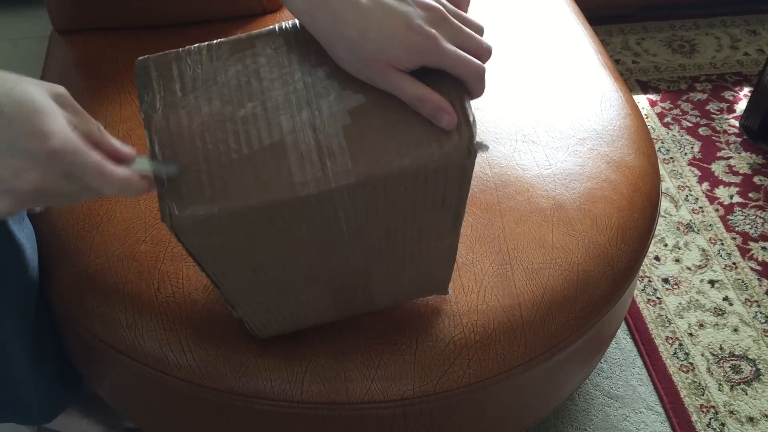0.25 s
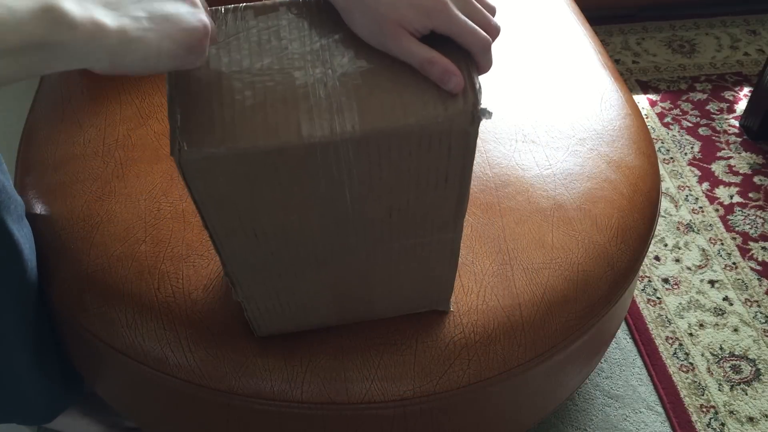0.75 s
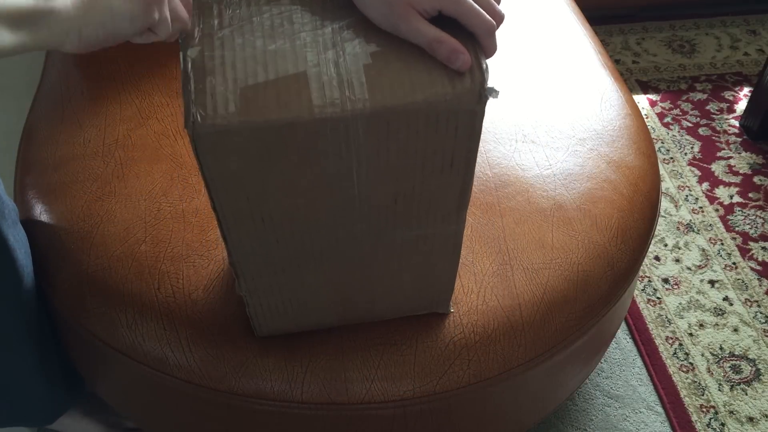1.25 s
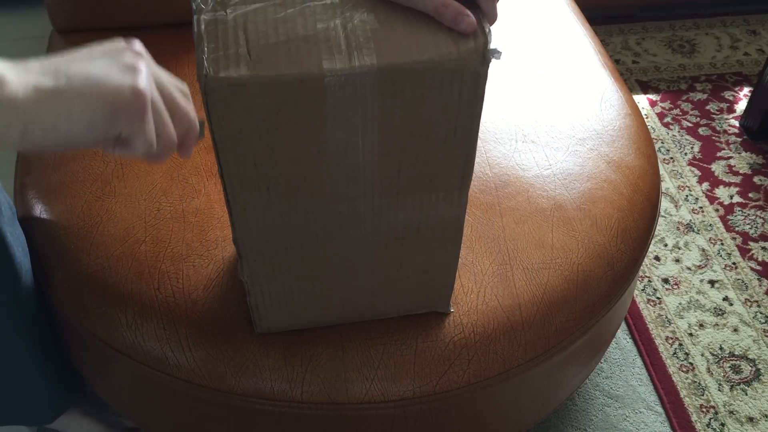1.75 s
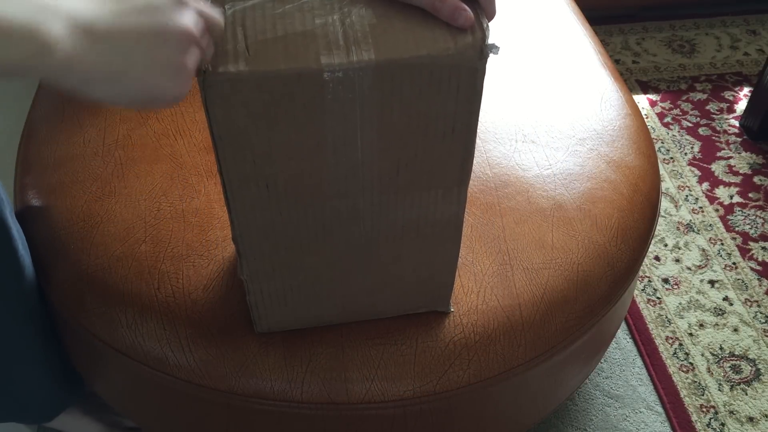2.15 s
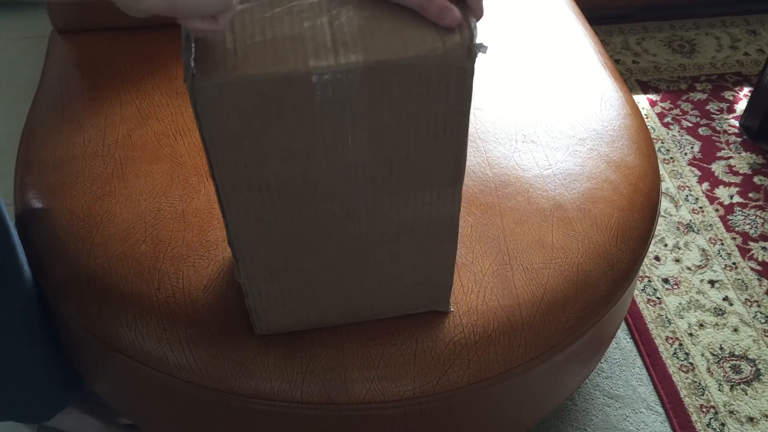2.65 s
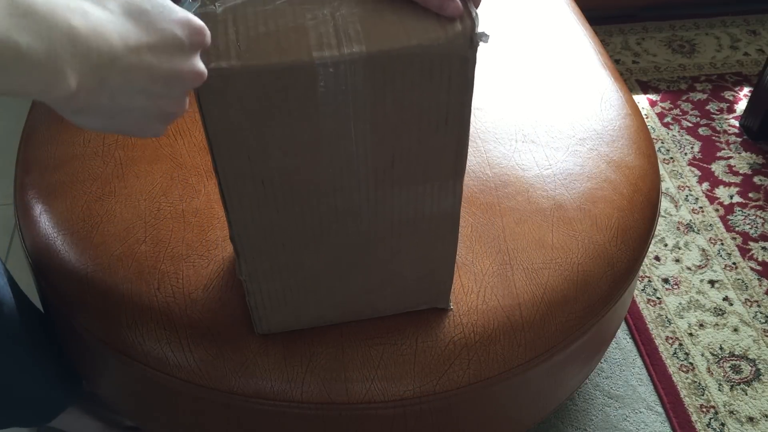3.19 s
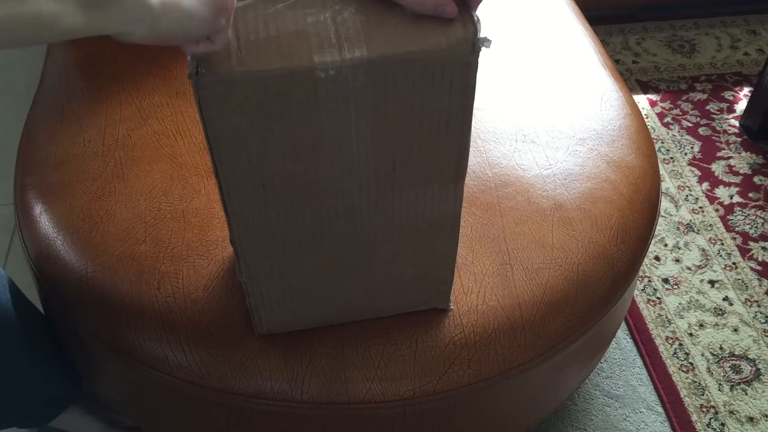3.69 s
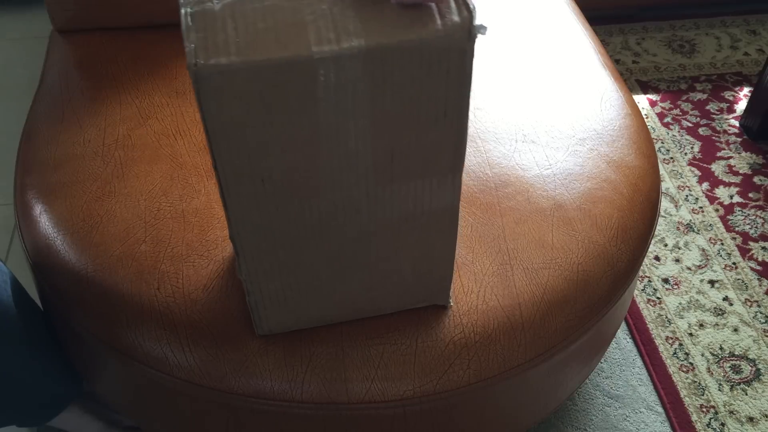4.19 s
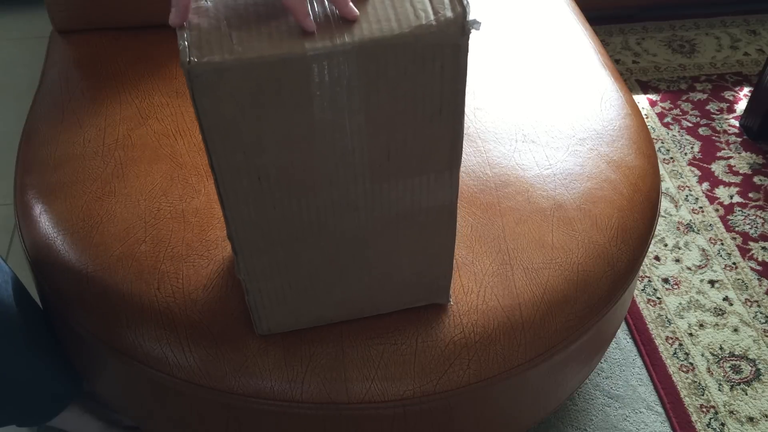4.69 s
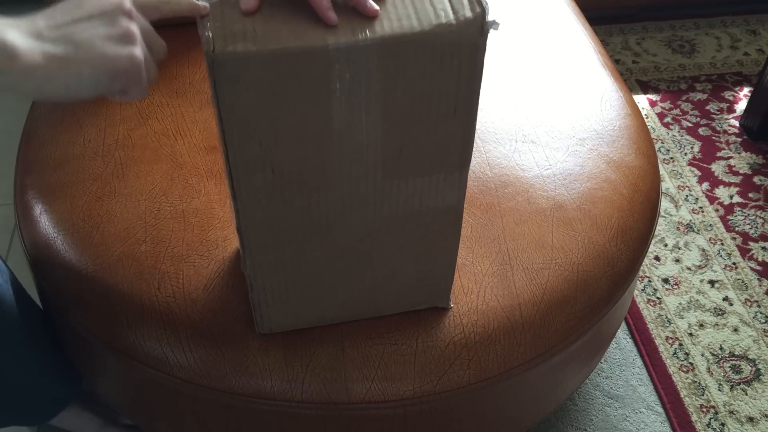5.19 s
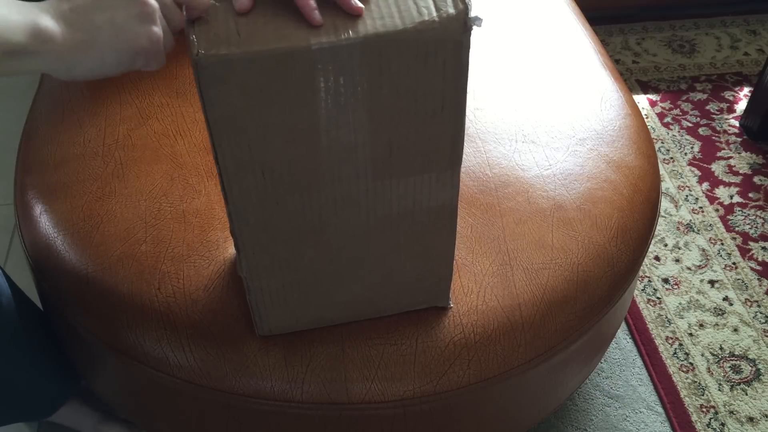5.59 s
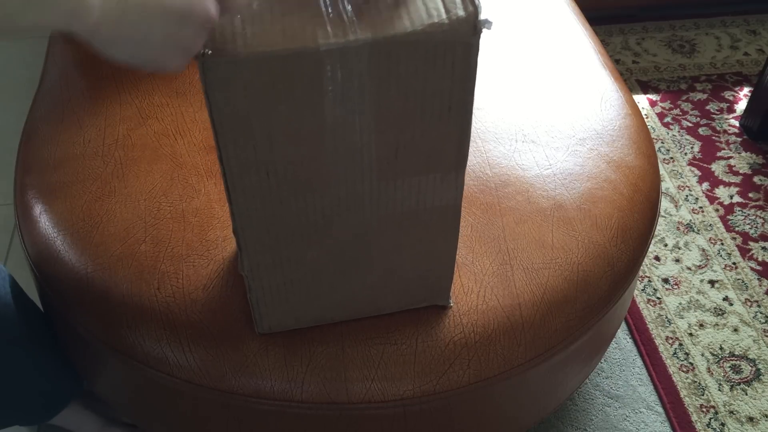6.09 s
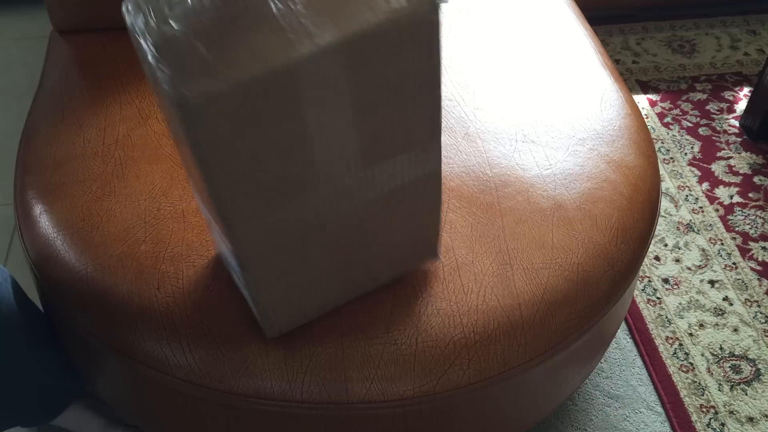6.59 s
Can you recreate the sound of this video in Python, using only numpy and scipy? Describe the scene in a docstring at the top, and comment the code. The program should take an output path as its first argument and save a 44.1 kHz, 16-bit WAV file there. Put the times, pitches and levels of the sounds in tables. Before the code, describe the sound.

Close to the microphone in a quiet, slightly live room, hands rub and pick at tape on a hollow cardboard box. Small crackly snaps lead to one huge, distorted pop, then a lull with soft bumps. Short gritty tears and knocks follow in separate bursts, a panel springs back with a hollow pop, and firm scrapes end it over faint mains hum.

```python
"""Packing tape on a cardboard box is handled and cut close to the microphone, in a quiet room with a mains hum
(6.9 s). Hands slide over the tape; at 1.5 s a blade punctures it with the loudest snap, which overloads the
microphone. The blade slices through the tape near 2.9 and 4.0 s, with short tearing strokes near 4.5 and 5.3 s,
amid knocks, light ticks and strokes; at 5.5 s a panel springs back. Rips, scrapes and snaps are random trains
of tiny breaks, filtered by the resonances of box and film; bumps and ticks are short bursts of the same kind,
the panel is a decaying sine, and the walls add diffuse tails."""
import sys
import numpy as np
from scipy import signal
from scipy.fft import rfft, irfft, next_fast_len
from scipy.io import wavfile
from scipy.ndimage import uniform_filter1d, map_coordinates

SR = 44100
rng = np.random.default_rng(int(sys.argv[2]) if len(sys.argv) > 2 else 0)


def log_audio(samples):
    """Write samples as a 16-bit WAV file to the path given in sys.argv[1]."""
    # one column per channel
    frames = np.atleast_2d(samples).T
    # limit to full scale, then quantise
    limited = np.clip(frames, -1, 1)
    pcm = np.round(limited * 32767).astype(np.int16)
    wavfile.write(sys.argv[1], SR, pcm)


N = 302085

# resonances of the hollow box: centre_hz, width_hz, relative_level_db
BOX_MODES = [(240.1, 52, 7.5), (372.6, 150, -8.5), (451.9, 55, -3), (599, 220, -7), (718, 85, -3.5),
             (944, 100, -2), (1240, 330, -4), (2040, 980, -7.5)]
# resonances of the taut film: centre_hz, width_hz, relative_level_db
FILM_MODES = [(2000, 390, -1.5), (2955, 500, 4.5), (3820, 1700, -1.5), (6400, 380, 0.5)]
# spectrum that breaking glue gives the film: frequency_hz, relative_density_db
FILM_BREAK_COLOUR = [(700, -24.5), (1900, 4), (3100, -2), (5000, -1.5), (6500, -2.5), (14000, -2)]
# spectrum of fine treble hiss and ticks: frequency_hz, relative_density_db
HISS_COLOUR = [(1500, -20.5), (3500, -8), (6400, 1), (7600, 1), (14000, 1.5)]


def amp(db):
    """Amplitude ratio of a level: 20 dB is a factor of ten."""
    return 10 ** (np.asarray(db) / 20)


def unit(x):
    """Normalisation to an rms of 1, so that a gain alone sets the level."""
    return x / np.sqrt(np.mean(x ** 2) + 1e-20)


def along(points, hz):
    """Linear interpolation over log frequency of (frequency_hz, value) points."""
    f, v = np.transpose(points)
    return np.interp(np.log(hz + 1), np.log(f + 1), v)


def coloured(x, points, modes=()):
    """Minimum-phase filtering: the cepstrum is folded to be causal; damped resonances may follow in parallel."""
    size = 2 * next_fast_len(len(x) // 2 + 2048)
    hz = np.fft.rfftfreq(size, 1 / SR)
    cepstrum = irfft(np.log(amp(along(points, hz))))
    cepstrum[1:size // 2] *= 2
    cepstrum[size // 2 + 1:] = 0
    response = np.exp(rfft(cepstrum))
    if len(modes):
        resonances = 0
        for k, (centre, width, db) in enumerate(modes):
            bandpass = 1j * hz * width / (centre * centre - hz * hz + 1j * hz * width)
            # neighbouring modes have opposite sign
            resonances = resonances + (-1) ** k * amp(db) * bandpass
        response = response * resonances
    return irfft(rfft(x, size) * response, size)[:len(x)]


def fractures(count, rate, spread_db, bed):
    """Fracture as shot noise: tiny breaks of glue and fibre, rate a second, of unequal size, on a finer bed."""
    sizes = amp(spread_db * np.clip(rng.standard_normal(count), -2, 2)) * rng.choice([-1, 1], count)
    breaks = unit(sizes * (rng.random(count) < rate / SR))
    return breaks + bed * rng.standard_normal(count)


def wobble(rate):
    """Band-limited random modulation: a smooth curve through rate random knots a second."""
    knots = rng.standard_normal(int(N * rate / SR) + 4)
    return map_coordinates(knots, [np.arange(N) * rate / SR])


def steadied(x, window=0.16):
    """Short-time normalisation: rms 1 over every window (s), the fine crackle kept."""
    power = np.abs(uniform_filter1d(x ** 2, max(2, round(window * SR))))
    return x / np.sqrt(power + 1e-12)


def roaming(x, modes, depth_db, rate):
    """Modal excitation by a moving contact, which feeds each resonance in changing measure."""
    total = 0
    for hz, width, db in modes:
        drive = x * amp(depth_db * wobble(rate))
        b, a = signal.iirpeak(hz, hz / width, SR)
        total = total + amp(db) * signal.lfilter(b, a, drive)
    return total


def played(rows, shape):
    """Incoherent superposition: two gains per sample, every row's shape at its two levels, added in power."""
    power = 0
    for *timing, low_db, high_db in rows:
        power = power + (amp([[low_db], [high_db]]) * shape(*timing)) ** 2
    return np.sqrt(power)


def background(air_db=-57.5):
    """Stationary noise and tones: coloured room air at a fixed rms, and the partials of a mains hum."""
    # spectrum of the room air: frequency_hz, relative_density_db
    air_colour = [(20, -12.5), (50, -8), (115, -10), (190, -16), (450, -33), (1200, -35.5), (4000, -42.5),
                  (15000, -48)]
    # partials of the mains hum: frequency_hz, rms_level_db
    hum_partials = [(59.6, -59.5), (120, -65), (360.5, -74)]
    t = np.arange(N) / SR
    hum = 0
    for hz, db in hum_partials:
        hum = hum + amp(db) * np.sqrt(2) * np.sin(2 * np.pi * (hz * t + rng.random()))
    return hum + amp(air_db) * unit(coloured(rng.standard_normal(N), air_colour))


def room(x, delay=.005):
    """Diffuse reverberation: noise decaying by band, with a freshly drawn noise tail for every third of a second."""
    # reverberation time of the room: frequency_hz, t60_s
    decay_points = [(150, 0.38), (900, 0.37), (1900, 0.54), (5000, 0.43), (15000, 0.34)]
    # strength of the reverberation: frequency_hz, relative_level_db
    level_points = [(250, -8.5), (600, -10), (1000, -8), (1900, -7), (4000, -6), (15000, -14)]
    out, step = np.zeros(N + 2 * SR), SR // 3
    for start in range(0, N, step):
        hz, t, z = signal.stft(rng.standard_normal(2 * SR // 3), SR, nperseg=256)
        t60 = along(decay_points, hz)[:, None]
        # equal energy whatever the decay time, before the level curve
        energy = np.sqrt(2 * np.log(1000) / (t60 * SR))
        fade = amp(along(level_points, hz)[:, None] - 60 * t / t60)
        tail = signal.istft(z * energy * fade, SR, nperseg=256)[1]
        wet = signal.fftconvolve(x[start:start + step], tail)
        out[start + round(abs(delay) * SR):][:len(wet)] += wet
    return out[:N]


def stroke(fastest, rise, fall, roundness=1.1, drop_db=25.5):
    """Level follows speed: a stroke quickens and slows in an arch, drop_db weaker at both ends than at its fastest."""
    t = np.arange(N) / SR - fastest
    return amp(-drop_db * np.abs(t / np.where(t < 0, rise, fall)) ** roundness)


def sliding(scrape_db=0.0, hiss_db=0, grip_db=2.5, firm_db=-47):
    """Friction noise: rubbing gives a fine hiss, a gritty scrape through the box, and crunches under a firm grip."""
    # strokes of hands and box: fastest_s, rise_s, fall_s, scrape_base_db, hiss_base_db
    strokes = [(0.2, 0.26, 0.87, -63.5, -73), (3.335, 0.056, 0.055, -58, -54.5),
               (3.79, 0.03, 0.066, -52.5, -50), (4.435, 0.14, 0.18, -57.5, -46.5),
               (4.52, 0.17, 0.024, -51.5, -54.5), (4.67, 0.031, 0.025, -76.5, -52),
               (5.1, 0.14, 0.27, -66, -62.5), (5.21, 0.056, 0.22, -53.5, -65),
               (5.93, 0.074, 0.07, -50.5, -47.5), (6.18, 0.069, 0.049, -45, -48),
               (6.45, 0.051, 0.097, -48, -53.5), (6.70, 0.18, 0.18, -56.5, -57)]
    # spectrum of the scraping contact: frequency_hz, relative_density_db
    scrape_colour = [(200, 0.5), (600, 3.5), (900, 2), (1300, 7.5), (2000, 2), (3500, 0.5), (8000, -7.5)]
    scrape, hiss = played(strokes, stroke)
    grip = unit(amp(grip_db * wobble(59)))
    grit = coloured(fractures(N, rate=440, spread_db=2.5, bed=0.6), scrape_colour)
    low = steadied(roaming(grit, BOX_MODES, depth_db=6.5, rate=33))
    high = unit(coloured(fractures(N, rate=560, spread_db=8.0, bed=2.6), HISS_COLOUR))
    crushing = coloured(fractures(N, rate=260, spread_db=5.0, bed=0), scrape_colour)
    crunch = steadied(roaming(crushing, [*BOX_MODES, *FILM_MODES], depth_db=6, rate=51))
    # a light touch only rustles; a firm one also crushes board and film
    firmness = scrape / (scrape + amp(firm_db))
    rubbing = amp(scrape_db) * scrape * (low + firmness * crunch)
    return grip * (rubbing + amp(hiss_db) * hiss * high)


def pull(start, hardest, end):
    """Tension and release: the tape grabs, the tension builds and slackens, the tape comes free."""
    build_db, sag_db = 14.5, 6  # growth up to the hardest moment, slackening after it
    grab_db_per_s, release_db_per_s = 2498.5, 700  # slopes of onset and dying away
    t = np.arange(N) / SR
    early = np.clip((hardest - t) / max(hardest - start, 1 / SR), 0, 1)
    late = np.clip((t - hardest) / max(end - hardest, 1 / SR), 0, 1)
    edges_db = grab_db_per_s * np.maximum(start - t, 0) + release_db_per_s * np.maximum(t - end, 0)
    return amp(-build_db * early ** 2 - sag_db * late - edges_db)


def tearing(board_db=-1, film_db=-1, heave_db=1, seat_give=0.017):
    """Shared excitation: one dense stream of breaks sounds in box and film, and the pull heaves the whole box."""
    # passes of tearing sound through tape and board: start_s, hardest_s, end_s, board_base_db, film_base_db
    pulls = [(1.38, 1.5, 1.63, -52.5, -51), (1.549, 1.555, 1.618, -20, -24.5),
             (2.73, 2.94, 3.017, -36.5, -40.5), (3.765, 3.955, 4.008, -38, -44.5),
             (4.03, 4.045, 4.071, -36.5, -53), (4.509, 4.528, 4.552, -37.5, -55.5),
             (5.234, 5.243, 5.42, -49.5, -61.5)]
    # spectrum that the breaks give the board: frequency_hz, relative_density_db
    board_colour = [(40, -10), (120, 6.5), (250, 6), (700, -1), (1400, -0.5), (6000, -9.5)]
    # spectrum of the heaving box: frequency_hz, relative_density_db
    heave_colour = [(25, -20), (70, -2.5), (140, -0.5), (450, -37.5)]
    board, film = played(pulls, pull)
    breaks = fractures(N, rate=1800, spread_db=3.5, bed=0.4) * amp(1.8 * wobble(160))
    box = roaming(coloured(breaks, board_colour), BOX_MODES, depth_db=4.5, rate=27)
    box = steadied(box, window=.03)
    tape = coloured(breaks, FILM_BREAK_COLOUR)
    tape = steadied(tape + .5 * roaming(tape, FILM_MODES, depth_db=3.0, rate=49))
    # the soft seat under the box limits how far it can heave
    heave = steadied(coloured(breaks, heave_colour)) * board / (1 + board / seat_give)
    return amp(board_db) * board * box + amp(film_db) * film * tape + amp(heave_db) * heave


def panel_pop():
    """Snap-through of a dented panel on the far side: it flips back and rings as a damped sine."""
    # the panel's flip: time_s, base_level_db, pitch_hz, width_hz
    flip = (5.483, -25, 936, 188)
    s, db, hz, width = flip
    t = np.maximum(np.arange(N) / SR - s, 0)
    ring = np.sin(2 * np.pi * hz * t) * np.exp(-np.pi * width * t)
    # the level is the energy spread over 10 ms
    return amp(db) * ring * np.sqrt(SR / 100 / np.sum(ring ** 2))


def knock(pitch, spot_db, bass_slope_db=6.0, treble_slope_db=15):
    """Impact excitation: hardness sets the band driven most, the spot struck the share of each resonance."""
    # falling to three times the slope values at an eighth and at eight times the pitch
    contact = [(pitch / 8, -3 * bass_slope_db), (pitch, 0),
               (pitch * np.sqrt(2), 0), (pitch * 8, -3 * treble_slope_db)]
    modes = [(hz, width, db + spot_db * rng.standard_normal()) for hz, width, db in BOX_MODES]
    return contact, modes


def light_tick(pitch, below_db=-10, above_db=-8, least_width_hz=80, width_hz_at_3k=300, widening=2.2):
    """Damped single resonance: a low pitch rings clearly, a high one is so damped that it only ticks."""
    skirts = [(pitch / 8, 2 * below_db), (pitch / 3, below_db), (pitch / 1.3, 0),
              (pitch * 1.3, 0), (pitch * 2.3, above_db)]
    relative_pitch = pitch / 3000
    # width_hz_at_3k comes on top of the least width
    return skirts, [(pitch, least_width_hz + width_hz_at_3k * relative_pitch ** widening, 0)]


def blows(spot_db, panels_db, board_lag=0.0046):
    """Coupling: a snap drives box and film, a bump the box; a crinkle or light tap rings only at its own pitch.

    Rows: time_s, level_db, length_s, colour, resonances."""
    # stuck tape lets go; panels_db and board_lag (s) add to the knock's level and length:
    # time_s, knock_base_db, knock_pitch_hz, film_crack_db, treble_tick_db, length_s
    snap_rows = [(0.801, -39.5, 1180, -39, -39.5, 0.013), (1.167, -38.5, 530, -41.5, -44, 0.016),
                 (1.3113, -43.5, 890, -41.5, -38.5, 0.011), (1.376, -42, 447, -47.5, -41, 0.049),
                 (1.411, -42, 1240, -30.5, -34.5, 0.0054), (1.528, -40, 791, -37, -40.5, 0.05),
                 (1.5484, -12.5, 894, -15.5, -14, 0.0081), (1.597, -25.5, 230, -29.5, -48, 0.0088),
                 (2.693, -59.5, 302, -41, -40.5, 0.015), (2.81, -32.5, 335, -45, -56, 0.015),
                 (2.855, -38, 504, -49, -55, 0.027), (2.919, -33, 710, -37.5, -31.5, 0.041),
                 (2.951, -27.5, 792, -33.5, -31.5, 0.039), (2.986, -40.5, 560, -36.5, -33, 0.016),
                 (3.7143, -34, 470, -48, -52, 0.011), (3.9765, -38.5, 450, -39, -37, 0.015),
                 (3.988, -33.5, 406, -44, -42, 0.015), (4.046, -43, 382, -44.5, -42, 0.024),
                 (4.535, -37.5, 513, -53.5, -52, 0.032), (4.5544, -52, 702, -52, -44.5, 0.016),
                 (5.233, -29.5, 538, -46.5, -38, 0.041), (5.292, -44.5, 298, -57, -39, 0.044),
                 (5.4823, -23, 590, -38.5, -26, 0.007), (5.916, -47.5, 902, -54, -45.5, 0.0086),
                 (6.194, -46, 1088, -51.5, -43.5, 0.038), (6.435, -37.5, 562, -47, -46, 0.032)]
    # dull bumps of the hands on the box, panels_db adds to the level: time_s, base_level_db, pitch_hz
    bumps = [(0.723, -51.5, 240), (2.1096, -49, 411), (2.4058, -48, 604), (2.729, -49, 597),
             (3.017, -38, 344), (3.326, -54.5, 400), (4.057, -37.5, 249), (4.928, -50.5, 260.6),
             (5.097, -57, 644), (6.394, -53.5, 594)]
    # light short sounds at one pitch: film crinkles and ticks, and below about 1 kHz hollow taps:
    # time_s, level_db, pitch_hz
    light_ticks = [(0.139, -56, 3160), (0.734, -50, 12400), (0.844, -52.5, 2880), (1.139, -44, 7300),
                   (1.227, -51, 5640), (1.351, -50, 8000), (1.427, -46.5, 9200), (1.4434, -45, 4700),
                   (1.8494, -50.5, 8650), (2.786, -44, 5930), (3.034, -50, 7600), (3.285, -57, 12000),
                   (3.352, -57.5, 10000), (3.4705, -47, 2660), (4.668, -56, 735), (4.86, -60.5, 4600),
                   (4.947, -62.5, 10000), (4.994, -63.5, 9030), (5.074, -58, 6400), (5.091, -63.5, 8000),
                   (5.195, -63, 2888), (5.24, -41, 14000), (5.302, -38, 13300), (5.711, -52, 1022),
                   (5.889, -44, 12000), (5.907, -45, 12110), (5.927, -50.5, 1980), (5.969, -57.5, 954),
                   (6.064, -49.5, 11600), (6.708, -59.5, 3200)]
    bump_s, tick_cycles = 0.022, 15  # length of a bump; length of a light tick in cycles of its pitch
    rows = []
    for s, board, pitch, crack, tick, length in snap_rows:
        rows.append((s, board + panels_db, length + board_lag, *knock(pitch, spot_db)))
        rows.append((s, crack, length, FILM_BREAK_COLOUR, FILM_MODES))
        rows.append((s, tick, length, HISS_COLOUR, ()))
    for s, db, pitch in bumps:
        rows.append((s, db + panels_db, bump_s, *knock(pitch, spot_db)))
    for s, db, pitch in light_ticks:
        rows.append((s, db, tick_cycles / pitch, *light_tick(pitch)))
    return rows


def snaps(clean_length, spot_db, panels_db, rise=0.0005, rise_share=0.2):
    """Impulsive excitation: a break and a quickly dying run of smaller ones drive the resonances of each blow."""
    t = np.arange(SR // 8) / SR
    out = np.zeros(N + SR)
    span = SR / 100  # a level is the energy spread over 10 ms
    for s, db, length, colour, modes in blows(spot_db, panels_db):
        # a longer run also takes longer to get going
        envelope = amp(-60 * t / length) * (1 - np.exp(-t / (rise_share * length)))
        burst = fractures(len(t), rate=2500, spread_db=5.5, bed=0.31) * envelope
        # the shortest snaps are mostly one clean break
        burst[round(rise * SR)] += np.linalg.norm(burst) * (clean_length / length) ** 2
        sound = coloured(burst, colour, modes)
        out[round(s * SR):][:len(t)] += amp(db) * sound * np.sqrt(span / np.sum(sound ** 2))
    return out[:N]


def scene():
    """Direct and diffuse field: the walls hear all sides of the box, more of its panels and evened-out snaps."""
    handling, pop = tearing() + sliding(), panel_pop()
    # the panel pop is heard mostly by way of the walls
    facing = snaps(clean_length=0.008, spot_db=2.5, panels_db=-0.5) + .5 * pop
    all_sides = snaps(clean_length=0.079, spot_db=2.0, panels_db=2.1) + 2 * pop
    reverberation = amp(-4.0) * room(all_sides + handling)
    return (facing + handling + reverberation + background())[None]


def record(dry):
    """Transducer limits: a dip in the treble, hard clipping of the highest peaks, and a band limit."""
    # treble dip of the microphone: frequency_hz, gain_db
    mic_response = [(9500, 0), (10400, -3.5), (11400, 0)]
    top_hz = 15450
    clipped = np.clip(coloured(dry[0], mic_response), -.65, .65)
    return signal.fftconvolve(clipped, signal.firwin(127, top_hz, fs=SR), "same")[None]


dry = scene()
out = record(dry)
log_audio(out)
```